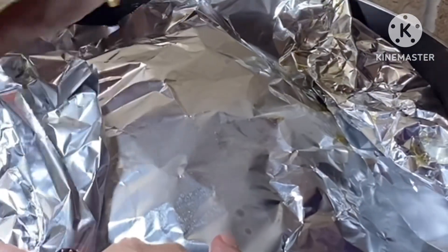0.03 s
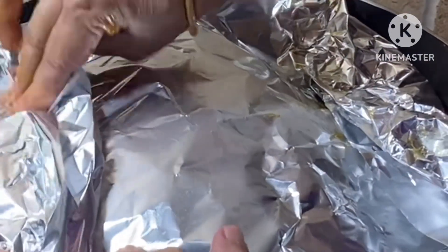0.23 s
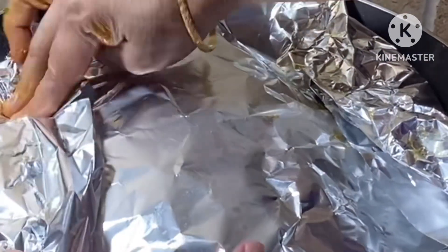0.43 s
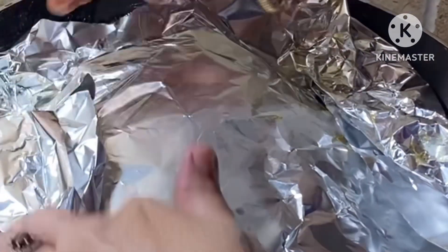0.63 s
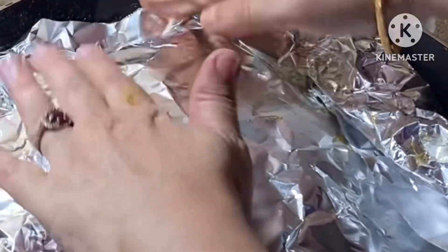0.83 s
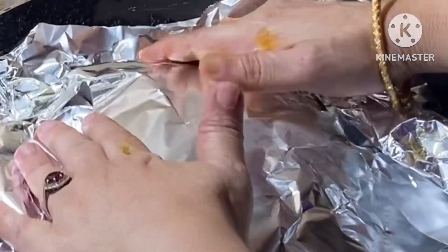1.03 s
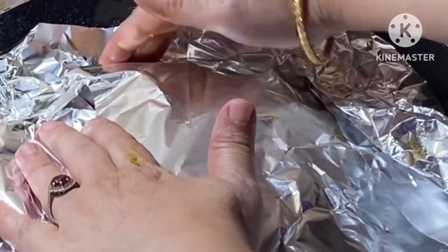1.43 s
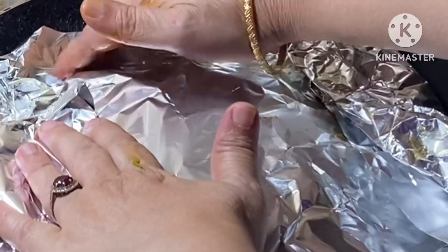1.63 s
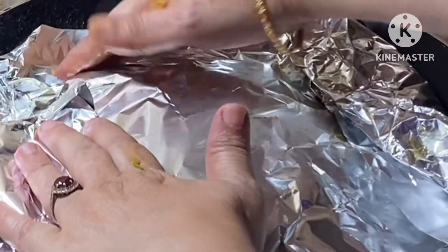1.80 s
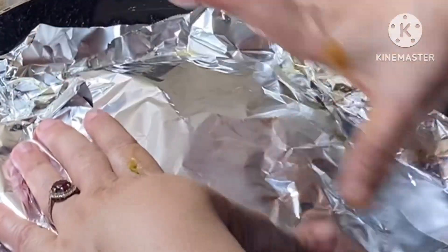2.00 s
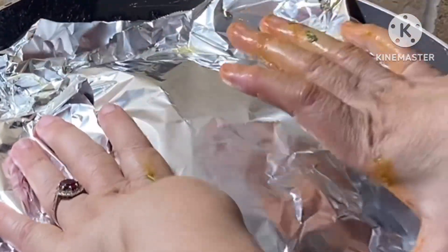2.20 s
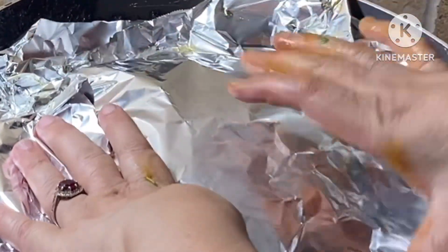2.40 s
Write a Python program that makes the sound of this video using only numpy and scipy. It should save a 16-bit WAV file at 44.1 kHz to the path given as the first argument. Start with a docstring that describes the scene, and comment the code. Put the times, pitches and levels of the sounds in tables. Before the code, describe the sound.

Aluminium foil crackles as hands press it over a pan, with a few ringing thumps.

```python
"""Hands press aluminium foil down over a dish in a pan, in a bare room. From the first stroke on,
hundreds of tiny creases buckle in a bright crackle, and a few larger ones snap on their own.
The hand makes the pan thump and ring at 0.3 s, twice more softly, then hard again at 1 s.
Lighter strokes follow, with snaps and small pings from taut facets, until a firm press brings
the fifth thump at 2.2 s and a last crackle. Room air and a faint hum lie underneath throughout."""
import sys
import numpy as np
from scipy import signal
from scipy.fft import rfft, irfft, next_fast_len
from scipy.io import wavfile

SR = 44100
rng = np.random.default_rng(int(sys.argv[2]) if len(sys.argv) > 2 else 0)


def to_wav(s):
    """Save 16-bit WAV."""
    ch = np.atleast_2d(s).T  # columns
    pcm = np.round(np.clip(ch, -1, 1) * 32767)  # PCM
    wavfile.write(sys.argv[1], SR, pcm.astype(np.int16))


N = 112454
T = np.arange(N) / SR


# The hand works the foil: t/s, swell/s, length/s, level/dB, tilt/(dB per octave)
HAND_STROKES = [(0.0, 0.0026, 0.054, -38, 0.5), (0.08, .006, 0.036, -37, 1.5),
                (0.12, 0.0071, 0.025, -33.5, -1), (0.157, 0.0065, 0.031, -34, -1),
                (0.193, 0.0072, 0.037, -31, -1), (0.232, 0.022, 0.057, -29, 5),
                (0.348, 0.028, 0.13, -49, 1.5), (0.492, 0.019, 0.044, -39.5, -1),
                (0.533, 0.01, 0.041, -39.5, -2), (0.601, 0.0047, 0.056, -47, 3),
                (0.867, 0.0024, 0.036, -43, -1), (0.894, 0.031, 0.059, -28.5, -0.5),
                (0.973, 0.0065, 0.015, -25.5, 3), (1.052, 0.02, 0.031, -39.5, -0.5),
                (1.141, 0.0049, 0.067, -44, -0.5), (1.3, 0.0074, 0.016, -35.5, 2),
                (1.316, .006, 0.01, -32.5, 1.5), (1.387, 0.013, 0.038, -49, -0.5),
                (1.458, .009, 0.019, -40.5, 1.5), (1.497, 0.013, 0.031, -46, -0.5),
                (1.586, 0.011, 0.02, -37.5, 1.5), (1.605, 0.015, 0.019, -28.5, 1.5),
                (1.638, 0.015, 0.044, -40.5, 2), (1.672, .004, 0.0099, -38.5, 2.5),
                (1.715, 0.0042, 0.0085, -46, 0.5), (1.818, .004, 0.015, -40.5, 3.5),
                (1.834, 0.023, 0.022, -38, -.5), (1.905, 0.0042, 0.032, -56, -4),
                (1.963, 0.0062, 0.03, -44, -2.5), (2.019, 0.013, 0.039, -39.5, -.5),
                (2.08, .006, .016, -44, 1), (2.116, 0.018, 0.043, -26.5, 0.5),
                (2.183, 0.01, 0.027, -23.5, -1), (2.225, 0.011, 0.078, -37.5, 2.5),
                (2.38, 0.0094, 0.068, -38.5, 2), (2.434, 0.008, 0.03, -42, -2)]
# EQ of the crackle: f/Hz, gain/dB
CRACKLE_EQ = [(150, -21), (400, -1.5), (1000, 2.5), (1400, 1), (2000, 6), (3200, 2.5), (5000, 2.5),
              (7500, 2), (11000, 0), (15500, 0)]

def crackle(bands=20, creases_per_s=6000, clumps_per_s=87, ring_cycles=3.23):
    """Under each stroke tiny creases buckle in clumps; each rings for a few cycles at its own pitch."""
    release_s, pivot_hz = 0.015, 6000
    clump_db, spread_db, colour_db = 2.47, 2.5, 2
    start, swell, length, db, tilt = np.transpose(HAND_STROKES)
    age = T - start[:, None]
    attack = np.clip(age / swell[:, None], 0, 1)
    release = np.exp(-np.maximum(age - length[:, None], 0) / release_s)
    power = (attack * release) ** 2
    clumps = from_db(clump_db * np.interp(T * clumps_per_s, np.arange(N), rng.standard_normal(N)))
    sizes = from_db(spread_db * np.minimum(rng.exponential(1, N), 4.5)) * rng.choice([-1, 1], N)
    buckles = rng.random(N) < creases_per_s / SR
    clicks = sizes * clumps * buckles
    band_of_click = rng.integers(0, bands, N)
    colours = colour_db * rng.standard_normal((len(start), bands))  # each stroke favours other pitches
    out = 0
    for k, hz in enumerate(np.geomspace(500, 15500, bands)):
        stroke_gains = from_db(db + tilt * np.log2(hz / pivot_hz) + colours[:, k])
        envelope = np.sqrt(stroke_gains ** 2 @ power)
        ticks = np.diff(clicks * (band_of_click == k), prepend=0)
        grains = rms_one(ring(ticks, hz, ring_cycles / hz))
        out = out + grains * envelope * np.sqrt(hz / pivot_hz / bands)
    return shaped(out, lambda hz: from_db(at_hz(CRACKLE_EQ, hz)))


# Single creases snap: t/s, relative level/dB, f/Hz
CREASE_SNAPS = [(.007, -23, 8100), (0.034, -23, 9180), (0.05, -24, 9300), (0.083, -20, 9200),
                (0.129, -26, 6000), (0.171, -19.5, 8500), (.461, -25, 12080), (0.492, -23, 11100),
                (0.512, -20, 10100), (0.888, -24.5, 10200), (1.138, -24, 8963), (1.185, -21, 9000),
                (1.219, -23.5, 9200), (1.382, -32, 8750), (1.412, -29.5, 6600), (1.524, -28, 8150),
                (1.676, -35, 8000), (1.714, -17, 11000), (1.772, -30, 8000), (1.788, -32, 10000),
                (1.826, -17.5, 15000), (1.92, -28.5, 8150), (1.974, -42, 8060), (2.049, -36, 8800),
                (2.382, -17.5, 11840)]

def snaps(trim_db=-12.5):
    """A larger crease flips over with a bright tick."""
    return sum(foil_burst(s, db + trim_db, hz, width_octaves=0.64, decay_s=0.001)
               for s, db, hz in CREASE_SNAPS)


# Taut facets of the sheet ping: t/s, level/dB, f/Hz
FACET_PINGS = [(.292, -27, 2150), (.538, -31, 2030), (1.326, -46, 3000), (1.411, -43, 5380),
               (1.47, -40.5, 4010), (1.726, -41, 3670), (1.848, -39.5, 2480), (1.955, -39.5, 2124)]

def pings(t60=0.056, partner_ratio=1.3, partner_db=-11):
    """A small facet rings briefly with two inharmonic partials."""
    out = np.zeros(N)
    for s, db, hz in FACET_PINGS:
        click = from_db(db) * signal.unit_impulse(N, int(s * SR))
        out += ring(click, hz, t60) + from_db(partner_db) * ring(click, hz * partner_ratio, t60 / 2)
    return out


# The hand knocks the pan: t/s, level/dB, hardness/dB, bass weight/dB, knock pitch/ratio
PAN_HITS = [(0.2562, 1.5, -2, -1.5, 0.95), (0.291, -3.5, 0.5, 4.5, 1.064), (.641, -9.5, -1, 1.5, 1.098),
            (.763, -15.5, -2.5, 4, 0.98), (0.9712, -2, 4, -0.5, 0.98), (.987, -1.5, -3, -4, 0.91),
            (1.001, -5, -11, -6.5, 1.102), (2.1863, -4.5, 1, 7, 1.08), (2.199, -2, -13, 2, 1.02)]

def strike(modes, scatter_db=0, retuned=False, bass_below_hz=260, hard_above_hz=1300):
    """Each hit sets the modes ringing: hardness sets the bite, bass weight the low end."""
    out, click = np.zeros(N + SR), signal.unit_impulse(SR // 2)
    for s, db, hard_db, bass_db, ratio in PAN_HITS:
        i = int(s * SR)
        for k, (hz, mode_db, t60) in enumerate(modes):
            colour_db = hard_db * (hz > hard_above_hz) + bass_db * (hz < bass_below_hz)
            colour_db += scatter_db * rng.standard_normal()
            tone = ring(click, hz * ratio if retuned else hz, t60)
            out[i:i + len(click)] += (-1) ** k * from_db(db + mode_db + colour_db) * tone
    return out[:N]


def crunches(trim_db=-22):
    """Foil is crushed at each hit, the more so the harder the contact."""
    return sum(foil_burst(s, db + hard_db + trim_db, pitch_hz=2040, width_octaves=0.92, decay_s=0.0018)
               for s, db, hard_db, _, _ in PAN_HITS)


# Damped modes of the contact: f/Hz, level/dB, t60/s
CONTACT_MODES = [(353.4, -12.5, 0.059), (473.7, -12, 0.042), (711, -14, 0.039), (1050, -14, 0.024),
                 (1812, -14, 0.0084), (2150, -14, .011), (3280, -23.5, 0.011)]

def knocks():
    """The contact gives a short, dead knock whose pitch and colour vary from hit to hit."""
    return strike(CONTACT_MODES, scatter_db=2.5, retuned=True)


# Ringing modes of the pan and its worktop: f/Hz, level/dB, t60/s
PAN_MODES = [(121, -30.5, 0.49), (138.8, -26, 0.27), (168.5, -23, 0.26), (187.8, -22.5, 0.44),
             (252.2, -26.5, 0.42), (297, -22, 0.22), (342, -23, .28), (382.5, -19.5, 0.41),
             (491, -20.5, 0.22), (668, -28.5, 0.26), (813, -14, 0.047), (1109, -18.5, 0.1)]

def pan_ring(swell_s=0.0051):
    """The ring of the pan swells over a few milliseconds, then dies away."""
    onset = [(hz, db, np.log(1000) * swell_s) for hz, db, _ in PAN_MODES]
    return strike(PAN_MODES) - strike(onset)  # taking away a fast decay softens the attack


# Reverb time of the bare room: f/Hz, t60/s
ROOM_DECAY = [(150, 0.44), (500, 0.44), (2000, 0.31), (6000, 0.38), (15000, 0.16)]

def room(x, predelay_s=0.0047):
    """The walls return a dense tail in which every band dies at its own rate."""
    t = T[:SR * 2 // 3]
    noise, tail = diffuse_noise(len(t)), 0
    for centre_hz, t60 in ROOM_DECAY:
        band = [(hz, float(hz == centre_hz)) for hz, _ in ROOM_DECAY]
        fade = from_db(-60 * t / t60) * (t > predelay_s)
        tail = tail + shaped(noise, lambda hz: at_hz(band, hz)) * fade / np.sqrt(np.sum(fade ** 2))
    return signal.fftconvolve(x[None], tail, axes=1)[:, :N]


def sheet_reverb(x, patches=3, hop_s=0.006):
    """Creases spring up all over the sheet, and each patch reaches the walls by paths of its own."""
    patch = rng.integers(0, patches, N)[(T / hop_s).astype(int)]
    return sum(room(x * (patch == k)) for k in range(patches))


# How alike the two sides sound: f/Hz, left-right correlation
LEFT_RIGHT_CORRELATION = [(100, 0.93), (250, 0.72), (500, 0), (2000, 0.068), (5500, 0.13), (9000, 1),
                          (15000, 0.83)]

def diffuse_noise(size):
    """White stereo noise, as alike on both sides as the table sets: close in the bass and top treble, apart in
    the mids."""
    mid, side = rng.standard_normal((2, size))
    alike = lambda hz: np.clip(at_hz(LEFT_RIGHT_CORRELATION, hz), -.99, .99)
    mid = shaped(mid, lambda hz: np.sqrt((1 + alike(hz)) / 2))
    side = shaped(side, lambda hz: np.sqrt((1 - alike(hz)) / 2))
    return np.array([mid + side, mid - side])


# Hum lines of an appliance: f/Hz, level/dB
HUM_LINES = [(97, -57.5), (172, -55.5), (302, -57), (495, -54)]

def hum():
    """An appliance drones on a few steady tones."""
    return sum(from_db(db) * np.sqrt(2) * np.sin(2 * np.pi * (hz * T + rng.random()))
               for hz, db in HUM_LINES)


# EQ of the room tone: f/Hz, gain/dB
AIR_EQ = [(20, -20.5), (50, -2), (95, -1), (180, -1), (300, -5.5), (600, -10), (1500, -15.5), (2600, -13),
          (4000, -20.5), (8000, -39), (16000, -36)]

def room_air(level_db=-48):
    """The air of the room lays down a soft, dark bed of noise."""
    air = shaped(diffuse_noise(N), lambda hz: from_db(at_hz(AIR_EQ, hz)))
    return from_db(level_db) * rms_one(air)


def foil_burst(s, db, pitch_hz, width_octaves, decay_s):
    """A few milliseconds of foil noise around one pitch, starting at time s."""
    out, t, i = np.zeros(N + SR), T[:1024], int(s * SR)
    bell = lambda hz: np.exp(-.5 * (np.log2((hz + 1) / pitch_hz) / width_octaves) ** 2)
    noise = rms_one(shaped(rng.standard_normal(len(t)), bell))
    envelope = t / decay_s * np.exp(1 - t / decay_s)
    out[i:i + len(t)] = from_db(db) * noise * envelope
    return out[:N]


def ring(clicks, hz, t60):
    """A unit click sets a sine of height 1 ringing."""
    r, w = from_db(-60 / (t60 * SR)), 2 * np.pi * hz / SR
    return signal.lfilter([0, np.sin(w)], [1, -2 * r * np.cos(w), r * r], clicks + 1e-18)


def shaped(x, response):
    """Filter by a gain given as a function of frequency."""
    size = next_fast_len(2 * x.shape[-1])
    return irfft(rfft(x, size) * response(np.fft.rfftfreq(size, 1 / SR)), size)[..., :x.shape[-1]]


def at_hz(points, hz):
    """Read a table on a log-frequency axis."""
    freqs, values = np.transpose(points)
    return np.interp(np.log(hz + 1e-6), np.log(freqs), values)


def from_db(db):
    """Decibels to gain."""
    return 10 ** (np.asarray(db) / 20)


def rms_one(x):
    """Scale to unit power."""
    return x / np.sqrt(np.mean(x ** 2) + 1e-20)


def panned(x, left_db):
    """Place a source between the two sides."""
    return x * from_db(np.array([[left_db], [-left_db]]) / 2)


def scene(foil_send_db=-2, knock_send_db=-1.5, pan_send_db=-10.5):
    """Foil and pan close by and a little to the left, with the room around them."""
    foil = crackle() + snaps() + pings()
    low_cut = signal.butter(2, 85, "high", fs=SR, output="sos")
    knock, body = signal.sosfilt(low_cut, [knocks() + crunches(), pan_ring()])
    walls = from_db(foil_send_db) * sheet_reverb(foil)
    walls += room(from_db(knock_send_db) * knock + from_db(pan_send_db) * body)
    direct = panned(foil, left_db=1.6) + panned(knock + body, left_db=2.2)
    return direct + walls + room_air() + hum()


# The microphone pair turns the treble out of phase: f/Hz, lag of the left side/turns
TREBLE_LAG = [(0, 0), (7000, 0), (8000, .22), (9000, .5), (9900, .8), (10700, 1), (11500, 1.04),
              (12300, 1.24), (13200, 1.5), (14000, 1.8), (14800, 2)]

def record(dry, cutoff_hz=16000):
    """The left treble lags, a soft clip rounds the peaks, and the top is cut."""
    lag_turns = lambda hz: np.interp(hz, *np.transpose(TREBLE_LAG))
    left = shaped(dry[0], lambda hz: np.exp(-2j * np.pi * lag_turns(hz)))
    rounded = 1.107 * np.tanh(np.array([left, dry[1]]) / 1.09)
    return shaped(rounded, lambda hz: np.clip((cutoff_hz + 150 - hz) / 300, 0, 1))


dry = scene()
out = record(dry)
to_wav(out)
```